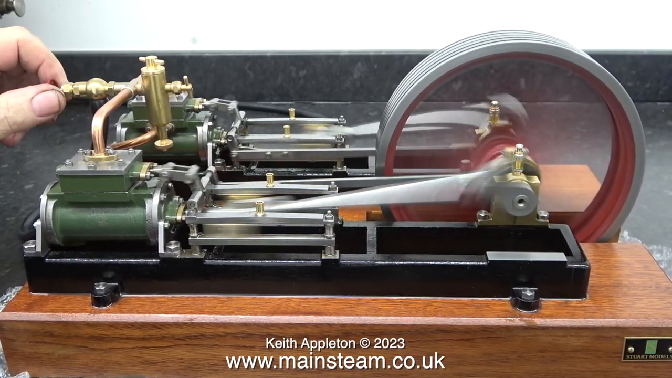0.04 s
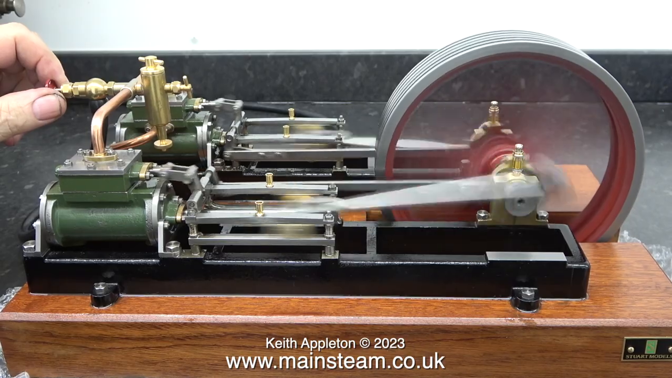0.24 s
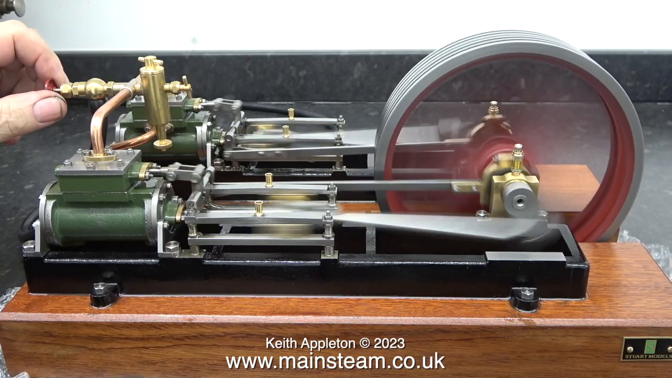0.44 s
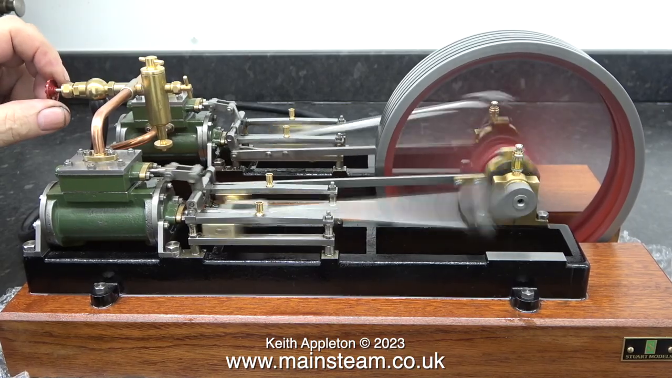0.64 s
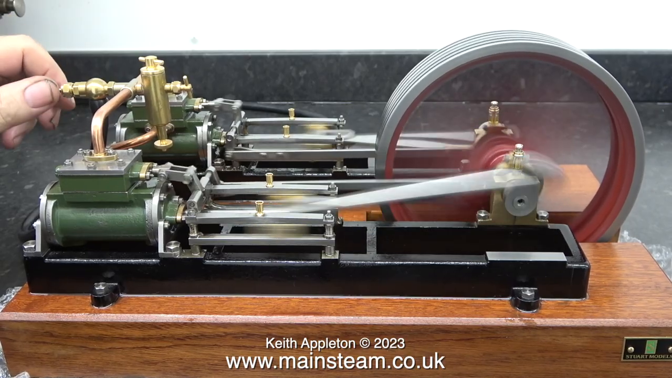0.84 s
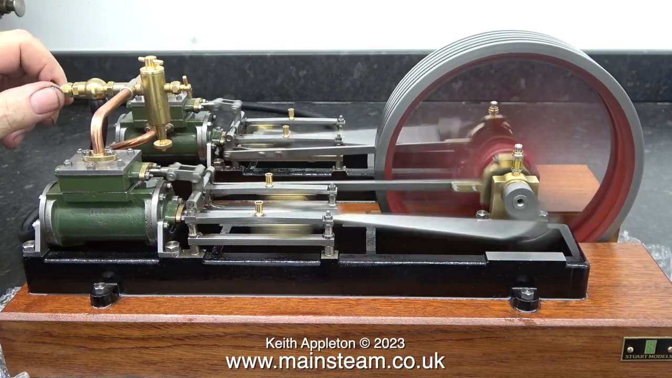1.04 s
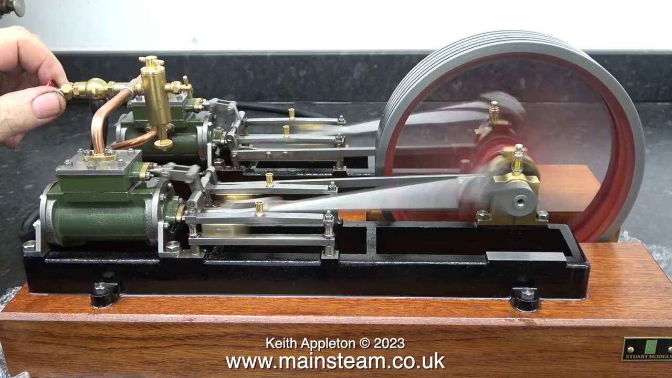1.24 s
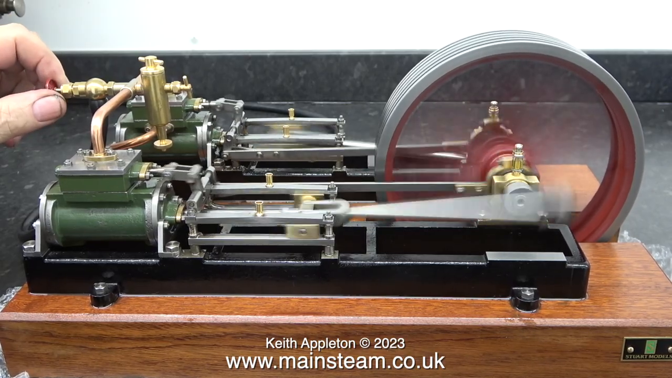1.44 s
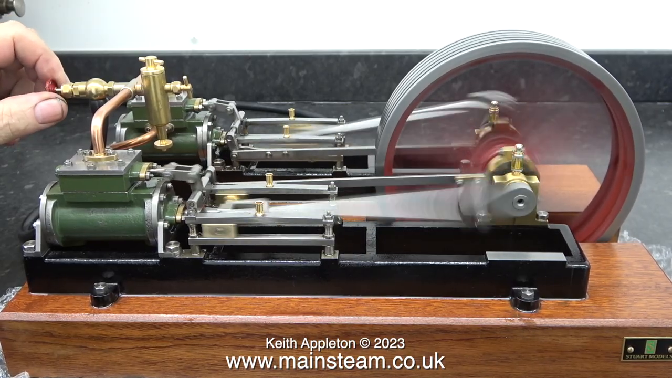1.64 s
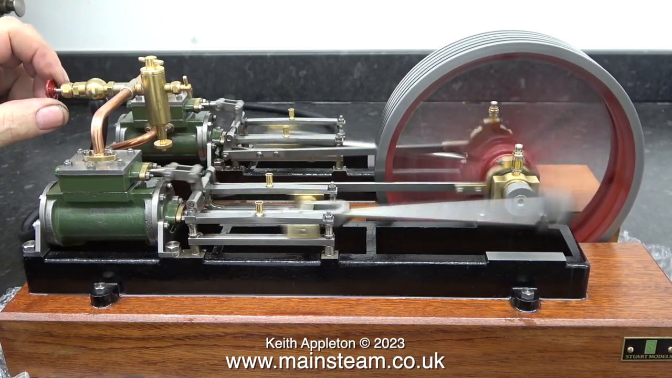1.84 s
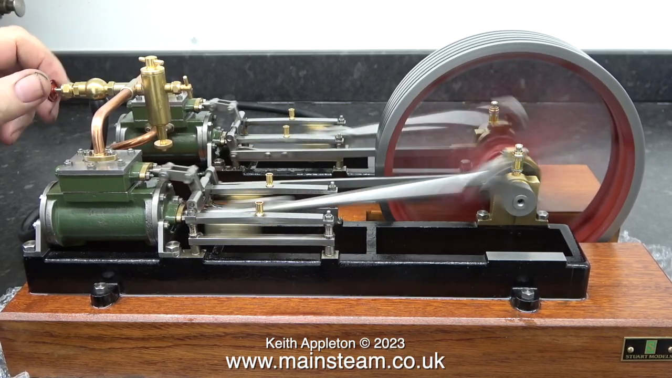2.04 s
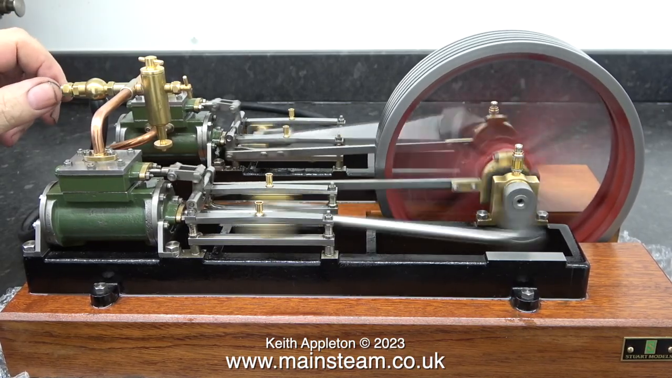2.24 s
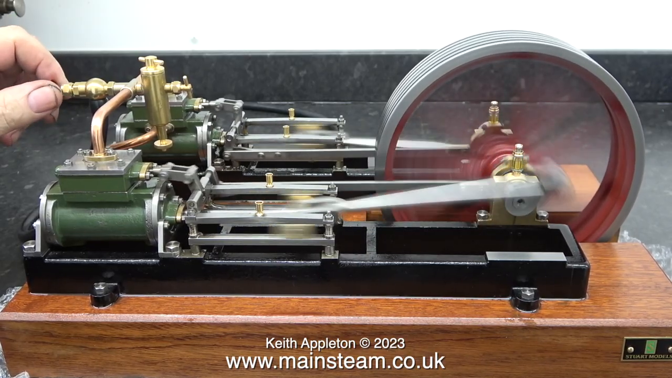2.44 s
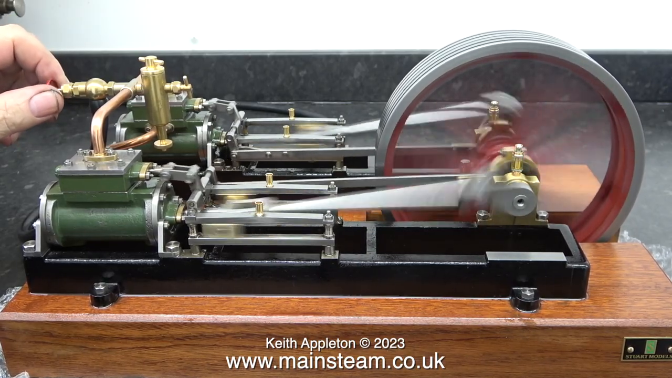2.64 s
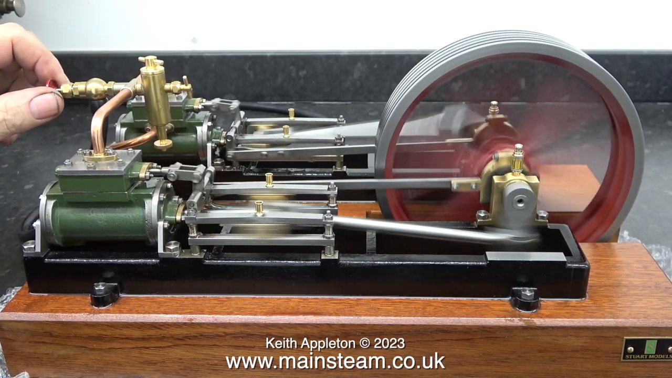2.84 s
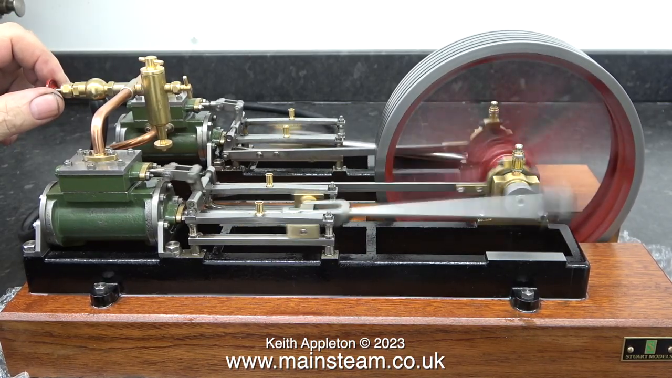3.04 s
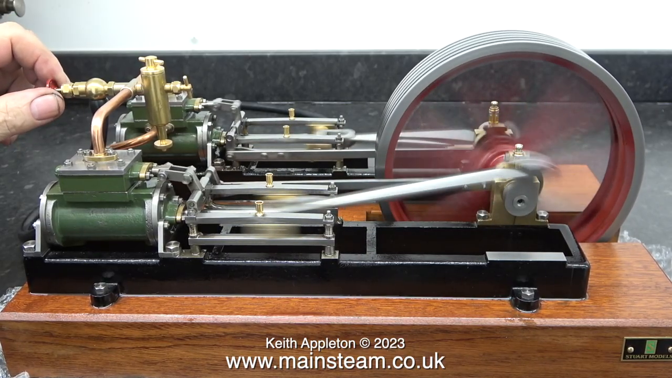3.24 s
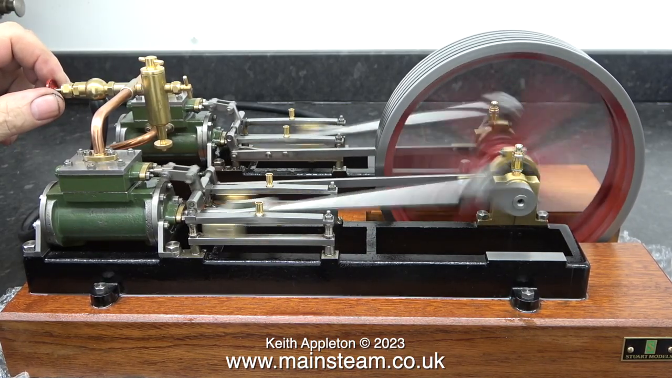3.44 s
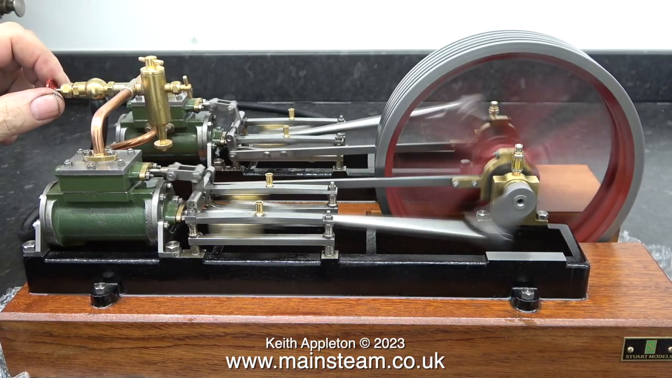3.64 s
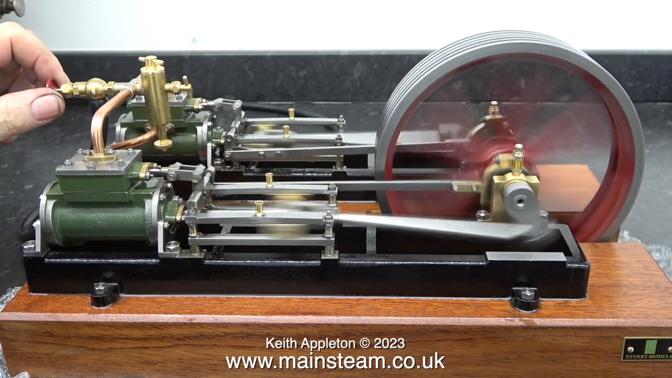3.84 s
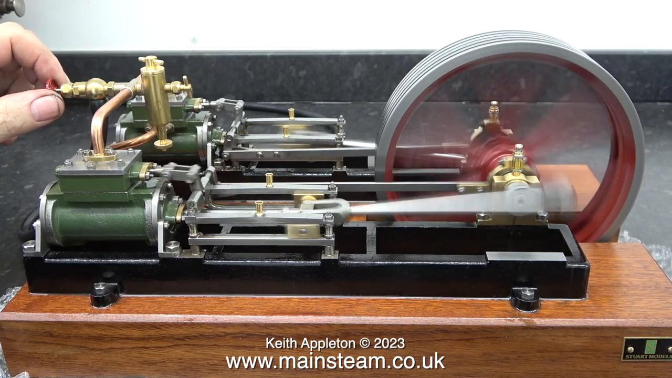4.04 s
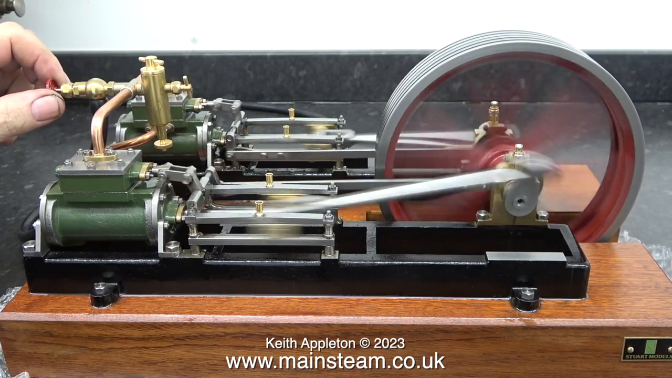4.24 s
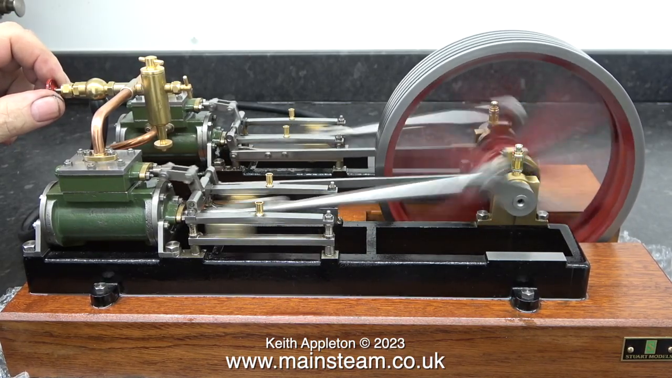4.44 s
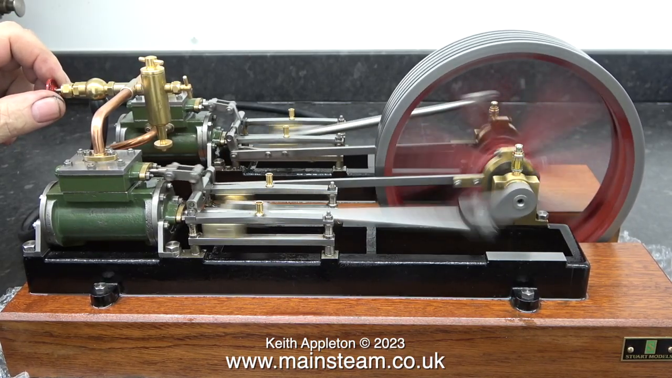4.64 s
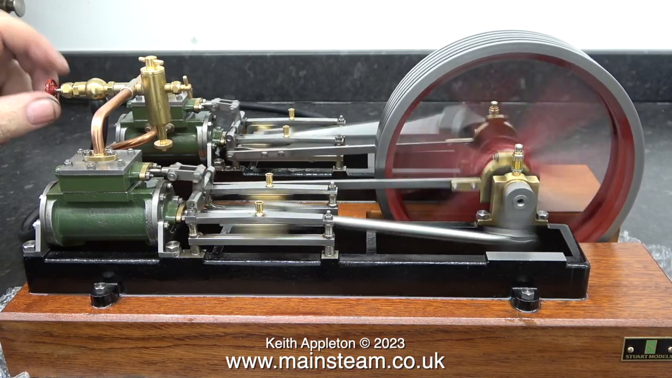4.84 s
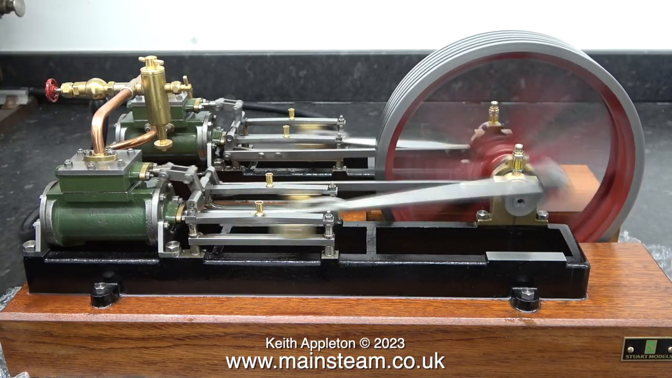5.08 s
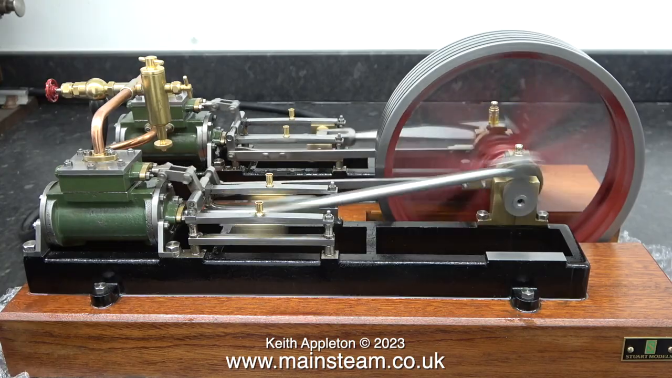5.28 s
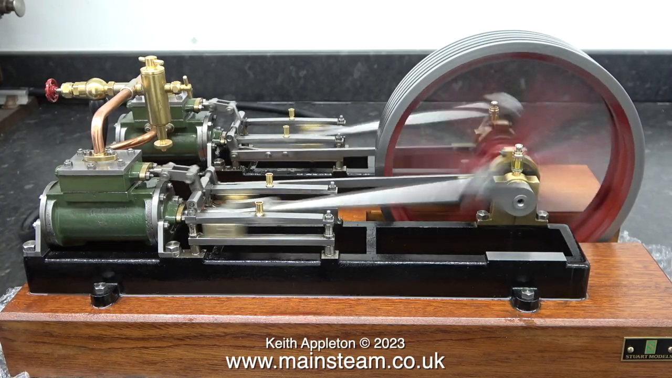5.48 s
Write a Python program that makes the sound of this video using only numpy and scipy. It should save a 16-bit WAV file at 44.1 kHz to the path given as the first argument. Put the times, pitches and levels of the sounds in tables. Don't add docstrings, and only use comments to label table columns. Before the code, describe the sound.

Fast, buzzing metal chatter from a miniature steam engine eases into a slower, softer, more distinct clacking rhythm in a small hard room.

```python
import sys
import numpy as np
from scipy import signal
from scipy.fft import rfft, irfft
from scipy.io import wavfile
from scipy.ndimage import uniform_filter1d, map_coordinates

SR = 44100
rng = np.random.default_rng(int(sys.argv[2]) if len(sys.argv) > 2 else 0)


def master(y):
    cut = np.clip(np.atleast_2d(y).T, -1, 1)
    pcm = np.round(cut * 32767)
    wavfile.write(sys.argv[1], SR, pcm.astype(np.int16))


def ratio(d):
    e = np.asarray(d, float) / 20
    return 10 ** e


N = 242991
T = np.arange(N) / SR
TAPS = 16384
HZ = np.maximum(np.arange(TAPS // 2 + 1) * SR / TAPS, 1)

THIRD_TURN_STARTS = [-.040, .306, .660, 1.023, 1.398, 1.795, 2.220, 2.665, 3.134, 3.629, 4.131, 4.639,
                     5.155, 5.682]
# (time [s], level [dB])
PRESSURE = [(0, 0.5), (.3, 0), (.67, 0), (.9, -0.5), (1.5, 0), (2, -0.5), (2.45, 0), (3, -0.5), (3.8, 0),
            (4.4, 0), (4.9, 0), (5.51, 0.5)]
# (place [turn], rise [ms], fall [ms], knock place [turn],
# bench thud place [turn], thud size [ratio])
STROKES = [
    (.035, 5.5, 4.9, 0.01, 0, 0.2),
    (.262, 3.7, 7.1, .228, .26, 0.75),
    (.5, 16, 21, .53, .475, 0.74),
    (0.774, 6.7, 4.8, .745, .75, 0.24),
]
# (time [s], rattle [dB], knock [dB])
ODD_BLOWS = [(.19, 0.5, -0.5), (.66, -0.5, 2), (.9, 2, -3), (1.05, 2.5, 1), (1.15, 0.5, -1),
             (1.4, -0.5, -17), (1.53, 0.5, -5), (1.66, -1, -10), (1.93, -1.5, -11), (1.97, -3, -9),
             (2.04, 0, 6), (2.37, 0.5, -10), (2.52, -0.5, -10), (2.67, 2, -4), (2.86, -3.5, 1),
             (2.98, -2.5, -12), (3.14, -0.5, 0), (3.34, 0, 2.5), (3.63, 1.5, 3.5), (3.8, 1.5, 1),
             (3.97, 0.5, 2.5), (4.13, 0, 1), (4.3, 0.5, 3.5), (4.47, 2, -8), (4.81, -2.5, -0.5),
             (4.98, 1.5, -2), (5.11, 1, -5), (5.33, -0.5, 0.5), (5.37, -1, 1.5)]

# (place [turn], level [dB])
BEARING = [(0, 3), (.18, -0.35), (.35, 1), (.55, -0.6), (.64, -4), (.72, 2.36), (.9, -2), (1, -1)]
# (level at slow speed [dB], rise per doubling of speed [dB])
RATTLES = [
    (-23.5, 9.3),
    (-26.5, 9.2),
    (-32, 16.5),
    (-25, 8.3),
]
# (frequency [Hz], width [Hz], level [dB])
FRAME_RINGS = [(2550, 120, .5), (3370, 150, -11), (4045, 110, -2), (4200, 140, -3), (4395, 110, -3),
               (5230, 260, -6), (6270, 260, 1), (6600, 200, -4), (7060, 200, -9), (8070, 130, -2),
               (8350, 250, -7), (8960, 180, -6), (12700, 150, -9), (15200, 150, -16), (15550, 250, -13)]
# (frequency [Hz], width [Hz], level [dB])
FRAME_HUMPS = [(2670, 620, -8), (4170, 1200, -10), (4860, 1750, -10), (6020, 940, -9.5), (7940, 1180, -6.5),
               (9870, 960, -5.5), (12050, 460, -5.5), (13600, 960, -8)]
# (frequency [Hz], level [dB])
FRAME_FLOOR = [(300, -59), (1500, -30.5), (2200, -17.5), (3500, -33.5), (7000, -18), (10500, -22),
               (11200, -51), (15800, -32)]
PART_LIMITS = [2000, 3500, 5700, 7300, 16000]
# (frequency [Hz], width [Hz], level [dB])
JOINT_RINGS = [
    [(6250, 300, 3), (13800, 600, 1), (12000, 500, -2), (15500, 200, -7), (1250, 400, -9)],
    [(14250, 500, -3), (6300, 400, 1), (1200, 300, -5)],
    [(4200, 500, -2), (2550, 200, -1)],
    [(14300, 550, -.5), (8080, 300, 2), (12300, 400, -1), (1150, 350, -7)],
]

# (frequency [Hz], width [Hz], level [dB])
BASE_RINGS = [(354, 31, -2), (390, 145, 3.5), (544, 82, -2.5), (744, 150, -0.5), (1172, 100, 1.5),
              (1305, 290, -0.5), (1670, 500, -2.5)]
# (frequency [Hz], level [dB])
BASE_FLOOR = [(60, -52), (150, -20), (250, -10), (900, -26), (1000, -27), (2000, -17), (4000, -41)]
# (full blow [dB], rise per doubling of speed [dB], mean shortfall [dB])
KNOCKS = [
    (-33.5, -0.5, 1.5),
    (-31.5, -5.5, 1.5),
    (-38, 4, 1.5),
    (-39, 2.5, 2),
]
# (frequency [Hz], width [Hz], level [dB])
KNOCK_RINGS = [
    [(566, 59, 5.5), (771, 77, 4), (393, 86, -11), (1410, 320, -7)],
    [(400, 76, 2.4), (780, 134, -0.011), (1293, 130, -0.5)],
    [(323, 92, 3.5), (626, 190, -2.5)],
    [(762, 144, 8.5), (1130, 200, 0.5), (370, 45, -17)],
]

PUSHES = [
    (.025, -.75),
    (.25, -.55),
    (.45, .8),
    (.75, -.7),
]
# (frequency [Hz], width [Hz], level [dB])
ROCKING = [(67, 9, 0)]
# (frequency [Hz], width [Hz], level [dB])
BENCH_RINGS = [(120, 45, 0), (160, 50, -1), (230, 60, -4)]
# (frequency [Hz], level [dB])
SPREAD = [(60, -24), (3000, -38), (6000, -44), (8000, -14), (10300, -8.5), (12000, -19), (15000, -31)]
# (frequency [Hz], level [dB])
CAPSULES = [(60, -6), (110, 1), (200, 3), (380, 3.5), (700, 6), (1290, 5.5), (2380, 3), (4400, 4),
            (8120, 2), (15000, 1.5)]


def level(x, db):
    return x * ratio(db) / np.sqrt(np.mean(x ** 2))


def colour(points):
    hz, db = np.transpose(points)
    return ratio(np.interp(np.log(HZ), np.log(hz), db))


def shaped(x, gain):
    centred = np.roll(irfft(gain), TAPS // 2)
    return signal.oaconvolve(x, centred)[TAPS // 2:][:N]


def body(x, modes, floor_gain, tilt_db=0., order=1):
    power = floor_gain ** 2
    for f, width, db in modes:
        power = power + ratio(2 * db) / (1 + ((HZ - f * f / HZ) / width) ** 2) ** order
    tilt = np.log(ratio(tilt_db)) * np.log2(HZ / 4000 + 0.066)
    cepstrum = irfft(np.log(power) / 2 + tilt)
    cepstrum[1:TAPS // 2] *= 2
    cepstrum[TAPS // 2 + 1:] = 0
    ring = irfft(np.exp(rfft(cepstrum)))
    return signal.oaconvolve(x, ring)[:N]


def walk(rate):
    hold = int(SR / rate)
    steps = np.repeat(rng.standard_normal(N // hold + 1), hold)
    return 0.44 * uniform_filter1d(steps, hold)[:N]


def grit(rate, spread_db):
    hardness = ratio(spread_db * np.minimum(rng.exponential(size=N), 4))
    hits = (rng.random(N) < rate / SR) * hardness
    return level(hits * rng.standard_normal(N), 0)


def turn_starts():
    count = len(THIRD_TURN_STARTS)
    longer = np.pad(THIRD_TURN_STARTS, pad_width=count, mode="reflect", reflect_type="odd")
    thirds = np.arange(0, count - 1, 1 / 3)
    thirds = np.append(thirds, thirds[-1] + 1 / 3)
    return map_coordinates(longer, [thirds + count])


def by_speed(s, slow_db, per_octave_db):
    starts = turn_starts()
    turns_per_s = np.interp(s, starts, 1 / np.gradient(starts))
    octaves = np.log2(turns_per_s / 6)
    return slow_db + per_octave_db * octaves + np.interp(s, *np.transpose(PRESSURE))


def odd_db():
    starts = turn_starts()
    s, *extras = np.transpose(ODD_BLOWS)
    turn = np.interp(s, starts, np.arange(len(starts)))
    out = np.zeros((2, 4 * len(starts)))
    out[:, np.round(4 * turn).astype(int)] = extras
    return out.reshape(2, -1, 4)


def blows(places, sizes):
    starts = turn_starts()
    turn = np.arange(len(starts))
    s = np.interp(turn[:, None] + places, turn, starts)
    inside = (s >= 0) & (s < T[-1])
    sizes = sizes * np.ones_like(s)
    out = np.zeros(N)
    np.add.at(out, (s[inside] * SR).astype(int), sizes[inside])
    return out


def bursts(places, peak_db, under_db, rise_ms, fall_ms, tail=0.3):
    under = np.interp(turn_starts()[:, None], T, under_db)
    added_power = ratio(2 * np.array(peak_db)) - ratio(2 * under)
    sizes = np.sqrt(np.maximum(added_power, 0))
    ms = np.arange(-(SR // 12), SR // 12 + 1) * 1000 / SR
    out = []
    for k, (rise, fall) in enumerate(zip(rise_ms, fall_ms)):
        swell = np.exp(-(ms / rise) ** 2)
        drop = (1 - tail) * np.exp(-(ms / fall) ** 2) + tail * np.exp(-abs(ms) / (4 * fall))
        shape = np.where(ms < 0, swell, drop)
        own_blows = blows(places, sizes * (np.arange(4) == k))
        out.append(signal.oaconvolve(own_blows, shape, "same"))
    return out


def motion_work(place):
    scrape_db = by_speed(T, slow_db=-32.5, per_octave_db=12.1)
    scrape = ratio(scrape_db + np.interp(place, *np.transpose(BEARING)))
    at, rise_ms, fall_ms = np.transpose(STROKES)[:3]
    peak_db = by_speed(turn_starts()[:, None], *np.transpose(RATTLES))
    peak_db = peak_db + odd_db()[0] + 0.42 * rng.standard_normal(peak_db.shape)
    rattles = bursts(at, peak_db, scrape_db + 1.5, rise_ms, fall_ms, tail=0.44)
    contacts = grit(14000, spread_db=0.4)
    chatter = grit(16000, spread_db=0.75)
    floor = colour(FRAME_FLOOR) / 2
    out = 0
    for lo, hi in zip(PART_LIMITS, PART_LIMITS[1:]):
        part = [mode for mode in FRAME_RINGS + FRAME_HUMPS if lo <= mode[0] < hi]
        rubbed = scrape * ratio(2.5 * walk(45)) * np.roll(contacts, lo)
        out = out + body(rubbed, part, floor, tilt_db=-1.64, order=1.5) * ratio(10.5)
        shaken = sum(rattles) * ratio(5 * np.tanh(.6 * walk(70))) * np.roll(chatter, lo)
        out = out + body(shaken, part, floor, tilt_db=1.66, order=1.5) * ratio(5.5)
    for rattle, joint in zip(rattles, JOINT_RINGS):
        out = out + body(rattle * chatter, joint, ratio(-37), order=2) * ratio(6.5)
    return out


def wooden_base(place):
    hum_db = by_speed(T, slow_db=-45.5, per_octave_db=9.9)
    bearing_db = 0.53 * np.interp(place, *np.transpose(BEARING))
    hum = ratio(hum_db + 1.9 * walk(40) + bearing_db) * rng.standard_normal(N)
    floor = colour(BASE_FLOOR)
    out = body(hum, BASE_RINGS, floor) * ratio(12.0)

    contact = 1 + .5 * rng.standard_normal(N)
    blow_ms = np.full(4, .15)
    full_db, per_octave_db, short_db = np.transpose(KNOCKS)
    peak_db = by_speed(turn_starts()[:, None], full_db, per_octave_db)
    peak_db = peak_db + odd_db()[1] - short_db * rng.exponential(size=peak_db.shape)
    knocks = bursts(np.transpose(STROKES)[3], peak_db, hum_db - 9.0, blow_ms, blow_ms)
    for knock, ring in zip(knocks, KNOCK_RINGS):
        out = out + body(knock * contact, ring, floor * ratio(-8.5), order=2) * ratio(17.0)

    drive = knocks[0] * contact * ratio(6.0) + hum * ratio(-4.5)
    drive = drive * ratio(by_speed(T, slow_db=4.2, per_octave_db=25.4))
    return out + body(drive, [(740.4, 100, 0)], ratio(-55), order=2)


def bench():
    shake_db = by_speed(T, slow_db=-52, per_octave_db=6.3)
    push_at, push = np.transpose(PUSHES)
    thud_at, thud_size = np.transpose(STROKES)[4:]
    push_uneven, thud_uneven = ratio(1.5 * rng.standard_normal((2, len(turn_starts()), 4)))
    skirt = colour([(30, -64), (45, -40), (90, -38), (280, -46), (500, -60)])
    pushes = blows(push_at, push * push_uneven)
    rock = level(body(pushes, ROCKING, skirt), -1.3)
    slop = 0.0062 * rng.standard_normal(thud_uneven.shape)
    thuds = blows(thud_at + slop, thud_size * thud_uneven)
    thud = level(body(thuds, BENCH_RINGS, skirt, order=2), -3.0)
    low = colour([(25, -30), (45, -3), (70, -3), (100, -8), (200, -4), (300, -30)])
    rumble = level(shaped(rng.standard_normal(N), low), -8)
    band = signal.butter(2, [45, 320], "band", fs=SR, output="sos")
    return signal.sosfilt(band, rock + thud + rumble) * ratio(shake_db + 1.0)


def room(dry):
    age = np.arange(SR // 3) / SR
    fade = ratio(-60 * age / .2) * (age > .0015)
    tails = rng.standard_normal((2, len(age))) * fade
    return [signal.oaconvolve(dry, tail / np.linalg.norm(tail))[:N] for tail in tails]


def scene():
    starts = turn_starts()
    place = np.interp(T, starts, np.arange(len(starts))) % 1
    engine = motion_work(place) + wooden_base(place)
    mid, side = room(engine)
    near = engine + ratio(-11) * mid + bench()
    return near + shaped(side, colour(SPREAD)) * np.array([[1], [-1]])


def band_limit(x):
    return signal.sosfilt(signal.butter(12, 15920, fs=SR, output="sos"), x)


def record(dry):
    half = np.sqrt(colour(CAPSULES))
    top = HZ < 15800
    left = shaped(dry[0], top * half)
    right = shaped(dry[1], top / half)
    return band_limit(np.array([left, right]))


dry = scene()
out = record(dry)
master(out)
```